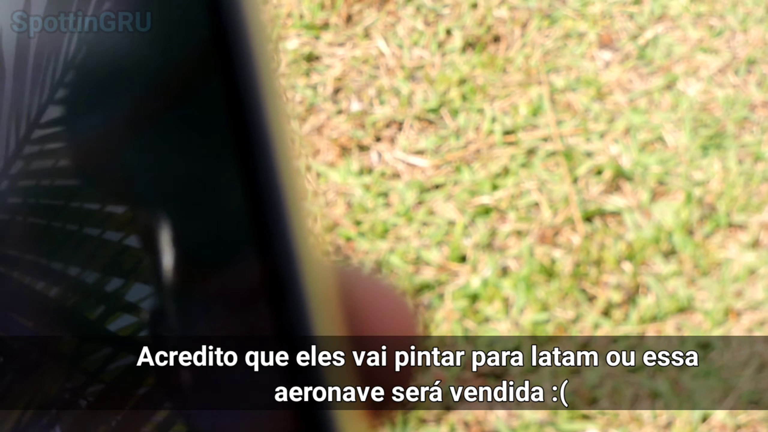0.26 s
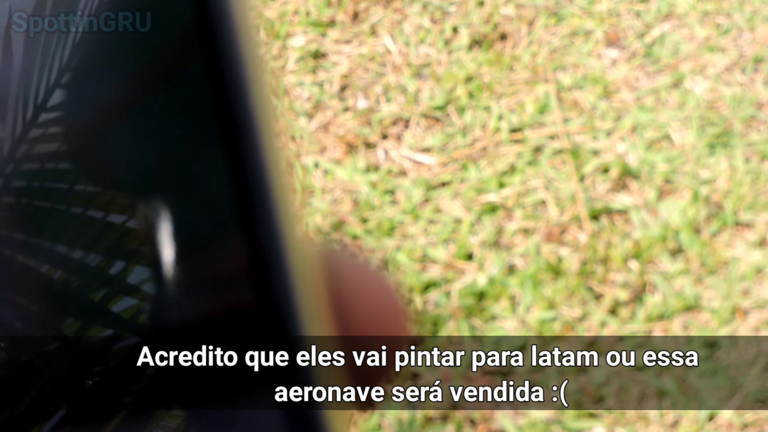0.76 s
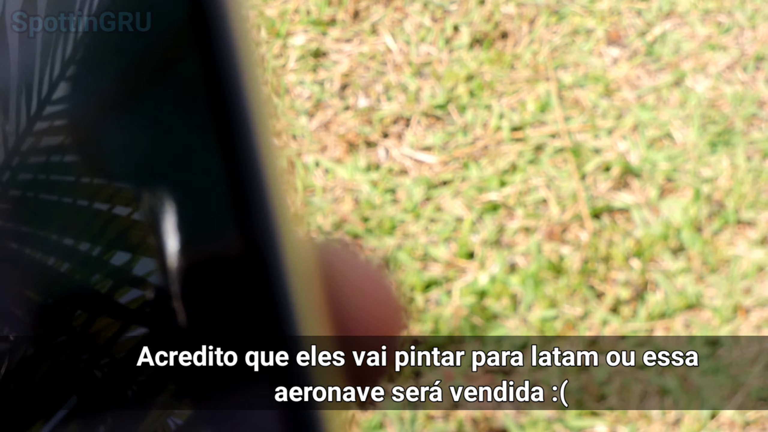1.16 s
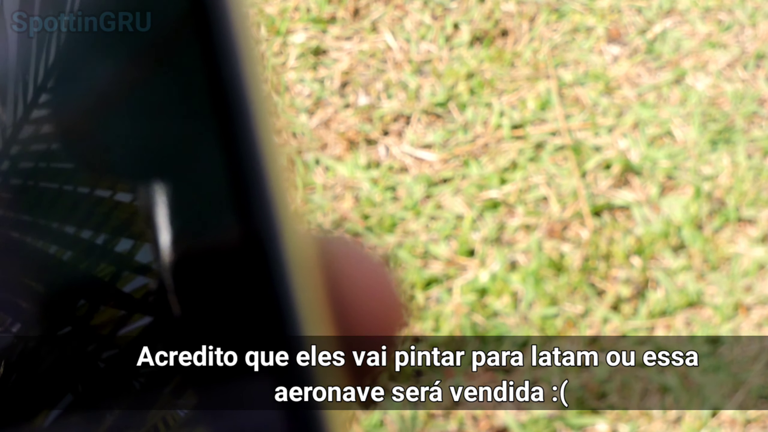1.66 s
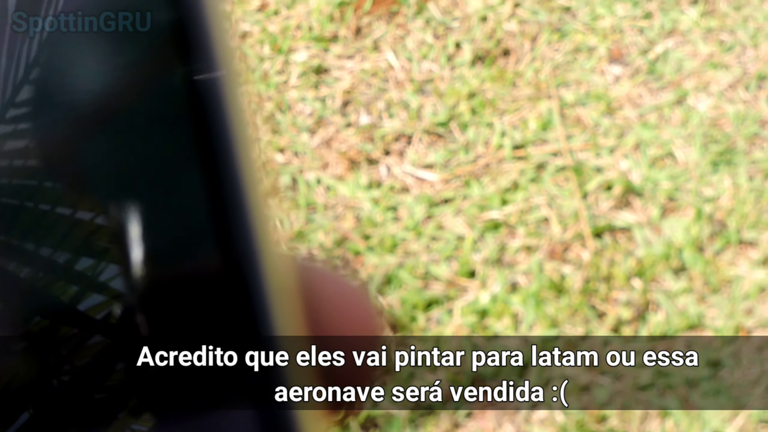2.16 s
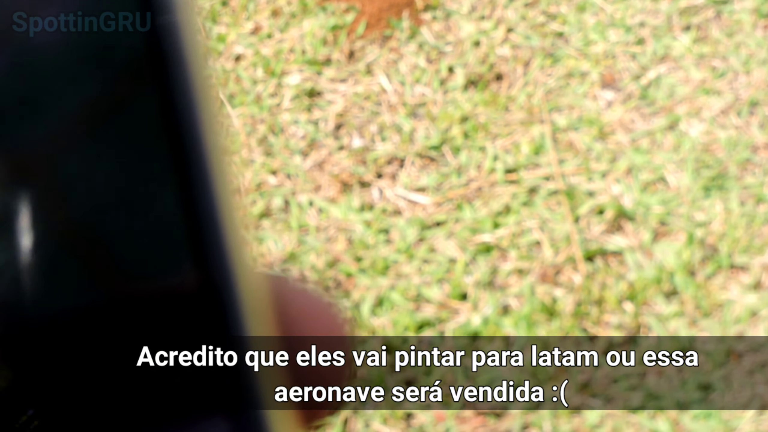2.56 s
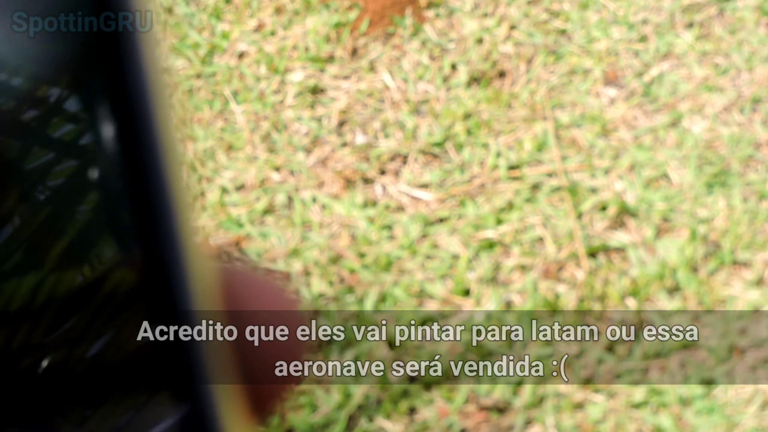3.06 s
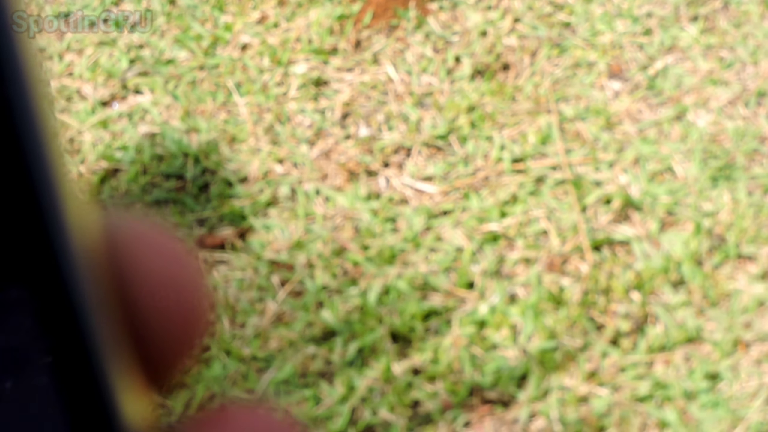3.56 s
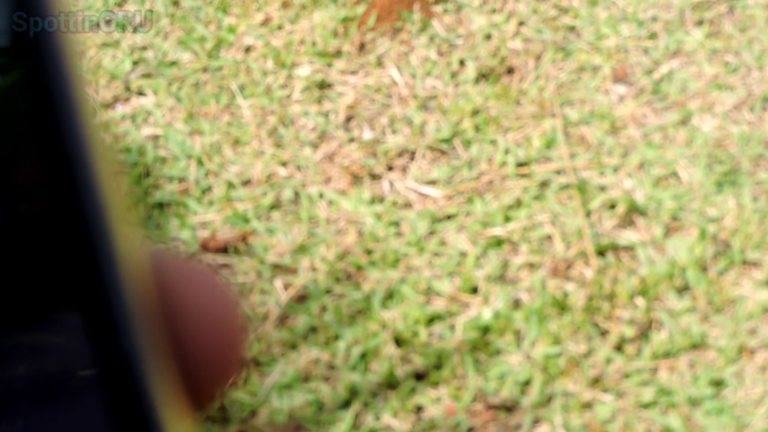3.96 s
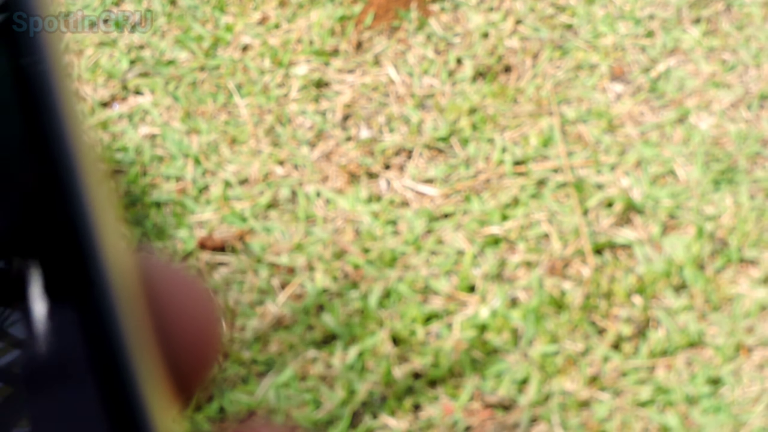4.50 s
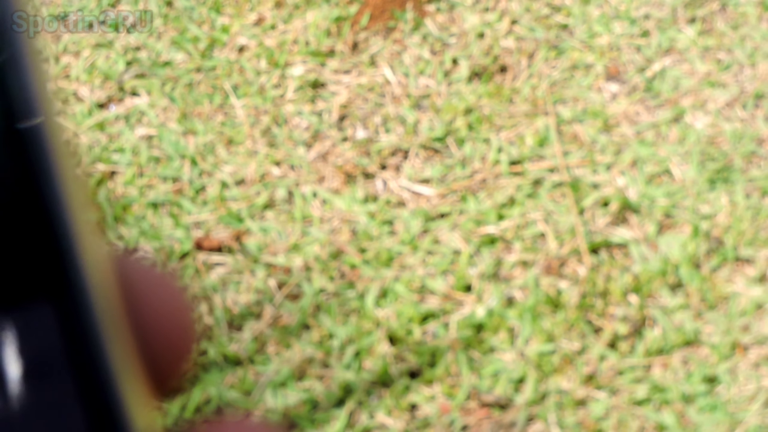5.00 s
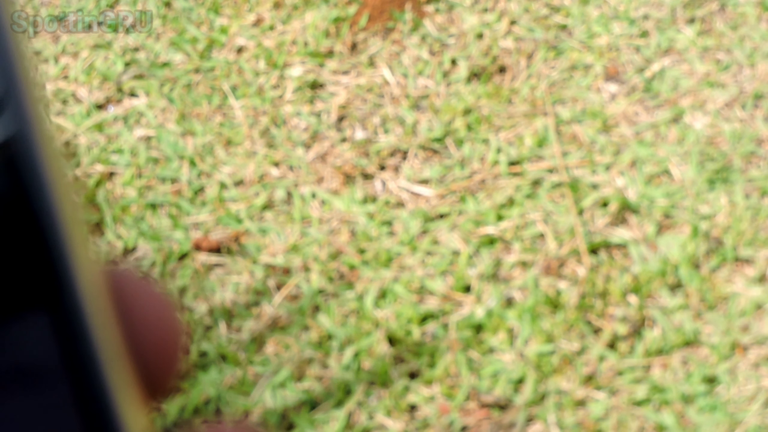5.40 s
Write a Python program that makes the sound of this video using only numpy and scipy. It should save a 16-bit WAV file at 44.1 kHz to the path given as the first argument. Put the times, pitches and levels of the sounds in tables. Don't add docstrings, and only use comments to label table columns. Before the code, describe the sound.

A deep, throbbing aircraft engine dominates at first, briefly rising, then weakens and wobbles downward before gradually pulling up in pitch. Under it sit another even engine hum and a muffled distant roar in open air, without room echo. A handheld device picks up light finger knocks early, brushing and crackling dry blades mid-way, and one crisp tick, stronger on the left, late on.

```python
import sys
import numpy as np
from scipy import signal
from scipy.fft import rfft, irfft, next_fast_len
from scipy.io import wavfile

SR = 44100
rng = np.random.default_rng(int(sys.argv[2]) if len(sys.argv) > 2 else 0)


def generate_wav(sig):
    pcm = np.round(np.clip(np.atleast_2d(sig).T, -1, 1) * 32767).astype(np.int16)
    wavfile.write(sys.argv[1], SR, pcm)


def decibels_to_gain(level_db):
    exponent = np.asarray(level_db, float) / 20
    return 10 ** exponent


N = 248724
LEFT_LEAD_RAD = .22

# start_s, level_db, turn_db (2nd minus 1st order)
LOAD = [(0, -16.5, 2.5), (.15, -17, 7.5), (.5, -17.5, 0.5), (.9, -21.5, -3), (1.05, -28, 4),
        (1.35, -31, -1), (1.62, -30.5, 6), (2.1, -36, 2), (2.35, -31.5, 1.5), (2.72, -34, -6.5),
        (2.88, -37.5, 21), (3.3, -28, 8.5), (3.8, -35.5, 18.5), (4.1, -31, 5), (4.55, -29.5, 3),
        (4.85, -28.5, -9.5), (5.35, -28.5, -20), (5.64, -31.5, -20)]
# start_s, pressure_db (as hiss level)
PRESSURE = [(0, -62.5), (.05, -70.5), (.4, -78), (1.12, -66.5), (1.6, -71), (1.65, -63), (1.78, -59),
            (1.9, -54), (2, -60), (2.17, -53.5), (2.4, -56.5), (2.8, -59.5), (3.05, -61.5), (3.18, -63),
            (3.4, -63.5), (3.6, -62.5), (3.92, -68), (5.64, -66.5)]


def rms_one(x):
    return x / np.sqrt(np.mean(x ** 2) + 1e-20)


def in_time(rows):
    s, *columns = np.transpose(rows)
    return [np.interp(np.arange(N) / SR, s, c) for c in columns]


def at_hz(points, hz):
    point_hz, value = np.transpose(points)
    return np.interp(np.log(hz), np.log(point_hz), value)


def swell(start_s, end_s, db, edge_s):
    t = np.arange(N) / SR
    return decibels_to_gain(db) * np.clip(np.minimum(t - start_s, end_s - t) / edge_s + .5, 0, 1)


def drift(rate_hz):
    r = np.exp(-80 * np.pi * rate_hz / SR)
    slow = signal.lfilter([1], [1, -2 * r, r * r], rng.standard_normal(N // 40 + 2002))[2000:]
    return np.interp(np.arange(N) / 40, np.arange(len(slow)), rms_one(slow))


def ring(clicks, hz, t60_s):
    r = decibels_to_gain(-60 / (t60_s * SR))
    w = 2 * np.pi * hz / SR
    return signal.lfilter([0, np.sin(w)], [1, -2 * r * np.cos(w), r * r], clicks + 1e-18)


def band_pass(x, degree, low_hz, high_hz):
    return signal.sosfilt(signal.butter(degree, [low_hz, high_hz], "band", fs=SR, output="sos"), x)


def ports(hz):
    # freq_hz, left_minus_right_db
    tilt = [(60, -1.5), (92, -1.5), (140, -1.0), (210, -0.5), (330, -0.5), (500, 1.5), (770, 5.5),
            (1170, 3.5), (1790, -0.5), (2740, -1.0), (4190, 0.0), (6410, 0.0), (9810, -0.5), (15000, 3.5)]
    return decibels_to_gain(at_hz(tilt, hz) / 2 * np.array([[1], [-1]]))


def banded_noise(spectrum, patchy_db, alike_more=0.):
    # freq_hz, left_right_likeness
    likeness = [(60, 0.97), (99, 0.97), (160, 0.97), (270, 0.96), (450, 0.84), (740, 0.8), (1220, 0.13),
                (2010, -0.12), (3330, -0.42), (5500, -0.01), (9080, 0.13), (15000, 0.25)]
    first_hz, last_hz = spectrum[0][0], spectrum[-1][0]
    edges_hz = first_hz * 2 ** np.arange(0, np.log2(last_hz / first_hz), 1 / 3)
    white = rng.standard_normal((2, 2, N + SR // 4))
    together, out = drift(2.5), 0
    for k, (low_hz, high_hz) in enumerate(zip(edges_hz, edges_hz[1:])):
        mid, side = band_pass(white[k % 2], 2, low_hz, high_hz)[:, -N:]
        hz = np.sqrt(low_hz * high_hz)
        alike = np.clip(at_hz(likeness, hz) / np.cos(LEFT_LEAD_RAD) + alike_more, -1, .997)
        flicker_db = patchy_db * (0.21 * together + drift(8.1))
        gain = decibels_to_gain(at_hz(spectrum, hz) + flicker_db) * ports(hz)
        out = out + gain * (np.sqrt(1 + alike) * mid + np.sqrt(1 - alike) * side * [[1], [-1]])
    return out / np.sqrt(np.mean(out.mean(axis=0) ** 2))


def order(turns, multiple, db, flutter_db, wander_rad):
    phase = 2 * np.pi * (multiple * turns + rng.random()) + wander_rad * drift(6.1)
    return np.sqrt(2) * decibels_to_gain(db + flutter_db * drift(4.4)) * np.sin(phase)


def engine():
    # start_s, firing_hz
    speed = [(0, 79.3), (.15, 79.5), (.45, 82.3), (.74, 84.3), (.9, 81.6), (1.05, 78.6), (1.2, 78),
             (1.4, 79.8), (1.6, 80.5), (2.15, 70.4), (2.33, 71.7), (2.76, 71.8), (2.84, 64.2), (3.3, 65.3),
             (4.05, 67.5), (4.55, 70.4), (5.05, 73.3), (5.64, 76.5)]
    # thirds_of_firing_rate, level_db
    uneven = [(4, -9), (7, 2.5), (8, -14.5), (10, -4.5), (11, -9), (12, -8.5), (13, 0.5)]
    # start_s, end_s, order, level_db
    whine = [
        (-.2, .85, 5, -44),
        (2.92, 3.5, 5, -44),
        (2.45, 2.82, 3, -37),
        (2.36, 2.74, 14, -53),
        (2.29, 2.74, 15, -50.5),
    ]
    turns = np.cumsum(in_time(speed)[0]) / SR
    level_db, turn_db = in_time(LOAD)
    main_db = level_db - turn_db / 2, level_db + turn_db / 2, level_db - 7
    low = sum(order(turns, k + 1, db, flutter_db=1.48, wander_rad=0.059) for k, db in enumerate(main_db))

    uneven_db = -46.5 + 0.95 * (level_db + 28.5)
    thirds = sum(order(turns, round(third) / 3., uneven_db + db, flutter_db=1.5, wander_rad=0.41)
                 for third, db in uneven)
    off_throttle = swell(1.12, 1.7, 0, edge_s=.15)
    low = low + (1 - off_throttle) * thirds

    high = sum(ports(70 * k) * swell(a, b, db, edge_s=.05)
               * order(turns, k, 0, flutter_db=0.3, wander_rad=.2) for a, b, k, db in whine)
    return low * ports(95) + high


def exhaust():
    level_db = in_time(LOAD)[0]
    hiss = band_pass(rng.standard_normal((2, N)), 2, 2400, 4000)
    return decibels_to_gain(-78.5 + (level_db + 29.5)) * rms_one(hiss)


def rubbing():
    # freq_hz, density_db_per_hz
    rub_colour = [(2940, -25.5), (5000, 1), (6340, -2), (8470, -4.5), (10700, -4), (13400, -10),
                  (15000, -9), (15900, -16)]
    # centre_hz, width_hz, level_db
    hollows = [
        (695, 290, -9),
        (2030, 300, 8),
        (3720, 330, 1.5),
        (6140, 510, 0),
    ]
    # centre_hz, width_hz, level_db
    squeaks = [
        (1040, 50, -3.5),
        (4660, 200, -4),
    ]
    # start_s, end_s, low_squeak_db, high_squeak_db
    strokes = [
        (1.66, 1.82, -53, -62),
        (1.82, 1.94, -47, -70),
        (2.08, 2.36, -55, -58),
        (2.45, 2.78, -60, -60),
        (2.98, 3.06, -54, -70),
    ]
    pressure_db, = in_time(PRESSURE)
    grain = decibels_to_gain(1.0 * drift(60) + 1.4 * drift(13))
    hiss = banded_noise(rub_colour, patchy_db=-0.5, alike_more=.1)
    noise = 0.73 * rng.standard_normal(N) + .5 * rng.standard_normal((2, N))

    def rung(hz, width_hz):
        return ports(hz) * rms_one(ring(noise, hz, 1.9 / width_hz))

    hollow_db = -73 + 0.52 * (pressure_db + 67)
    hollow = sum(decibels_to_gain(hollow_db + db) * rung(hz, width_hz) for hz, width_hz, db in hollows)
    squeak = 0
    for k, (hz, width_hz, db) in enumerate(squeaks):
        stroke_gain = sum(swell(a, b, levels_db[k], edge_s=.04) for a, b, *levels_db in strokes)
        steady_gain = decibels_to_gain([-60, -74.5][k] + 0.33 * (pressure_db + 65))
        squeak = squeak + decibels_to_gain(db) * (steady_gain + stroke_gain) * rung(hz, width_hz)
    return grain * (decibels_to_gain(pressure_db) * hiss + hollow + squeak)


def click():
    # start_s, left_db, right_db
    contacts = [
        (5.4193, -5.5, -12.5),
        (5.4204, -21, -20),
        (5.4240, -31, -35),
    ]
    # freq_hz, level_db, t60_s
    plastic_modes = [(1910, -10.5, 0.0031), (2820, -11, 0.0042), (4350, -7, 0.0036), (5840, -3, 0.0018),
                     (8270, -11, 0.0069), (10410, -6.5, 0.0035), (12360, 1.5, 0.0016), (14000, -4, .002)]
    hits = np.zeros((2, N))
    for s, left_db, right_db in contacts:
        hits[0, round(s * SR)] += decibels_to_gain(left_db)
        hits[1, round(s * SR) + 4] += decibels_to_gain(right_db)
    tick = 0
    for k, (hz, db, t60_s) in enumerate(plastic_modes):
        right_tilt = decibels_to_gain([[0], [6 - .7 * hz / 1000]])
        tick = tick + decibels_to_gain(db - 2.5) * right_tilt * (-1) ** k * ring(hits, hz, t60_s)
    since = np.maximum(np.arange(N) / SR - contacts[0][0], 0) / .0035
    echoes = since * np.exp(1 - since) * rng.standard_normal((2, N))
    return tick + decibels_to_gain(-36) * band_pass(echoes, 2, 6500, 11500)


def snaps():
    # start_s, peak_db, centre_hz
    blade_snaps = [(.189, -54, 7000), (.29, -57, 12100), (.879, -57, 10000), (.972, -53, 10500),
                   (1.099, -50, 11500), (1.489, -56, 12000), (1.638, -41, 11000), (1.685, -43, 9800),
                   (1.729, -51, 9500), (1.842, -41, 13200), (1.904, -45, 11000), (2.099, -49, 7700),
                   (2.134, -45, 6900), (2.184, -46, 13000), (3.219, -43, 4700), (3.221, -47, 13500),
                   (3.254, -50, 3700), (3.375, -39, 4500), (3.376, -44, 12500), (3.454, -53, 11000),
                   (3.554, -46, 4600), (3.556, -44, 11900), (3.65, -54, 13100), (3.969, -42, 4700),
                   (4.929, -55, 12000), (4.999, -53, 10500)]
    out, t = np.zeros((2, N)), np.arange(SR // 20) / SR
    high_pass = signal.butter(2, 3500, "high", fs=SR, output="sos")
    for s, db, hz in blade_snaps:
        puff = rng.standard_normal((2, len(t)))
        broad = signal.sosfilt(high_pass, puff)
        top = band_pass(puff, 1, 0.65 * hz, min(1.25 * hz, .45 * SR))
        shape = np.exp(-t / .005) * decibels_to_gain([[1.5], [-1.5]])
        i = round(s * SR)
        out[:, i:i + len(t)] += decibels_to_gain(db - 8) * (.3 * broad + 1.7 * top) * shape
    return out


def knocks():
    # start_s, peak_db
    taps = [
        (0.037, -39.5),
        (0.155, -40),
        (0.3, -33),
        (1.508, -41.5),
    ]
    hits = np.zeros(N)
    for s, db in taps:
        hits[round(s * SR)] = decibels_to_gain(db)
    case = decibels_to_gain(-3.5) * ring(hits, 620, .012)
    case = case + decibels_to_gain(-10.5) * ring(hits, 1800, 0.01) + decibels_to_gain(-12.5) * ring(hits, 3200, 0.0033)
    return ports(700) * case


def steady_engine():
    # start_s, cycle_hz, level_db
    far_engine = [(0, 46.1, -32), (.5, 47.16, -35.5), (1.2, 47.28, -25.5), (1.7, 47.26, -35.5),
                  (2.5, 47.59, -37), (3.2, 48.4, -32.5), (4, 48.74, -30), (4.8, 48.84, -31),
                  (5.64, 48.72, -35.5)]
    far_orders_db = [-16, 0.5, -3]
    # start_s, end_s, order, level_db
    far_swells = [
        (.85, 1.5, 6, -38),
        (2.65, 3.8, 1, -33),
        (3.7, 4.5, 7, -42),
    ]
    hz, level_db = in_time(far_engine)
    turns = np.cumsum(hz) / SR
    hum = sum(order(turns, 2 ** k, level_db + db, flutter_db=0.94, wander_rad=.15)
              for k, db in enumerate(far_orders_db))
    swells = sum(swell(a, b, db, edge_s=.15) * order(turns, k, 0, flutter_db=4.0, wander_rad=0.22)
                 for a, b, k, db in far_swells)
    return ports(120) * (hum + swells)


def roar():
    # freq_hz, density_db_per_hz
    roar_low = [(18, -20.5), (26, -8.5), (40, -2), (58, -1), (110, -1.5), (160, -5), (230, -9.5),
                (330, -28)]
    # freq_hz, density_db_per_hz
    roar_mid = [(120, -18.5), (200, -3), (290, -1), (400, -0.5), (480, -19), (620, -27)]
    # freq_hz, density_db_per_hz
    air_colour = [(290, -29), (500, -6), (561, -3.5), (639, 0.5), (806, -4.5), (1280, -10), (2120, -10),
                  (3330, -16), (3730, -16), (6110, -27), (7060, -27.5), (13900, -34.5), (15900, -42)]
    t = np.arange(N) / SR
    pressure_db, = in_time(PRESSURE)
    deep = decibels_to_gain(-28 + 0.23 * t) * banded_noise(roar_low, patchy_db=0.43)
    upper_db = -39 + 7.5 * np.exp(-(t / 1.2) ** 2)
    upper = decibels_to_gain(upper_db) * banded_noise(roar_mid, patchy_db=0.1)
    air_db = -48 + 0.16 * (pressure_db + 66)
    return deep + upper + decibels_to_gain(air_db) * banded_noise(air_colour, patchy_db=0.97)


def scene():
    near = rubbing() + click() + snaps() + knocks()
    return engine() + exhaust() + near + steady_engine() + roar()


def roll_off(x):
    return signal.sosfilt(signal.butter(12, 16020, fs=SR, output="sos"), x)


def record(dry):
    fade = np.r_[np.ones(N), np.hanning(SR // 2)[-SR // 4:]]
    longer = np.pad(dry, ((0, 0), (0, SR // 4)), "reflect", reflect_type="odd") * fade
    size = next_fast_len(N + SR // 2)
    turn = np.exp(.5j * LEFT_LEAD_RAD * np.array([[1], [-1]]))
    led = irfft(rfft(longer, size) * turn, size)[:, :N]
    cut = signal.sosfilt(signal.ellip(10, .5, 60, 15500, fs=SR, output="sos"), led)
    return roll_off(cut)


dry = scene()
out = record(dry)
generate_wav(out)
```